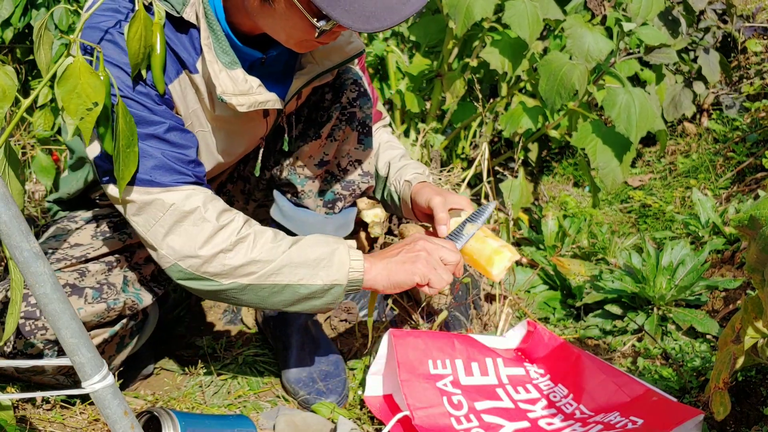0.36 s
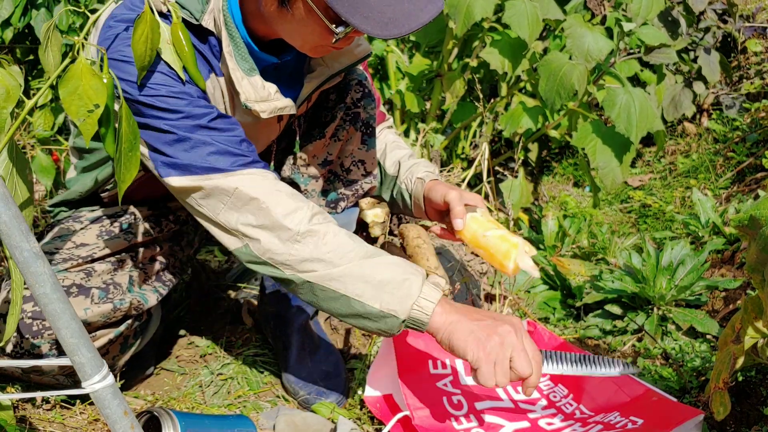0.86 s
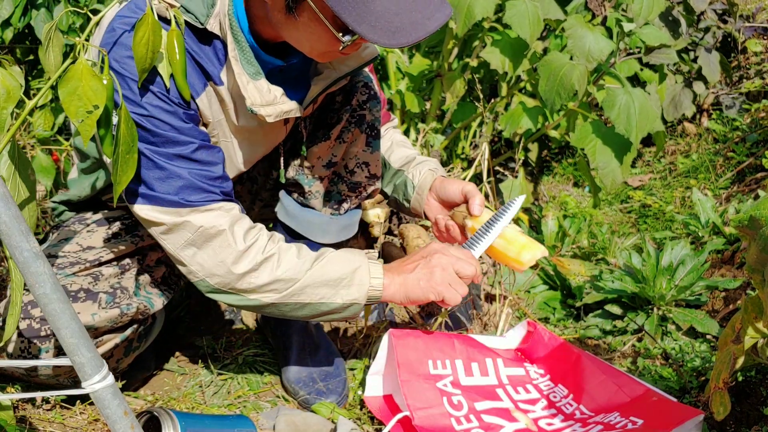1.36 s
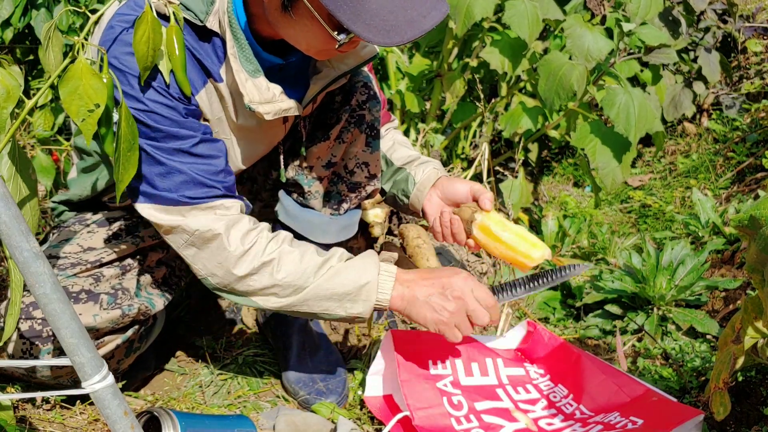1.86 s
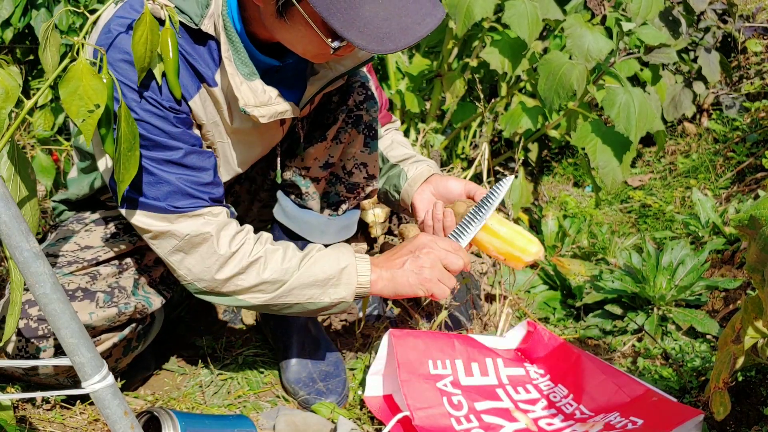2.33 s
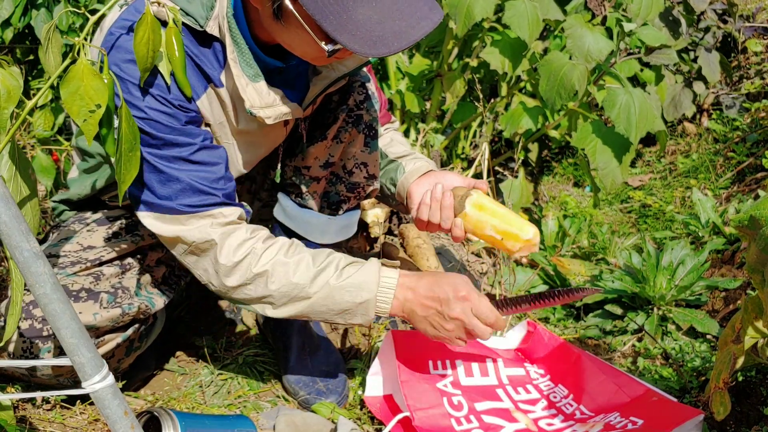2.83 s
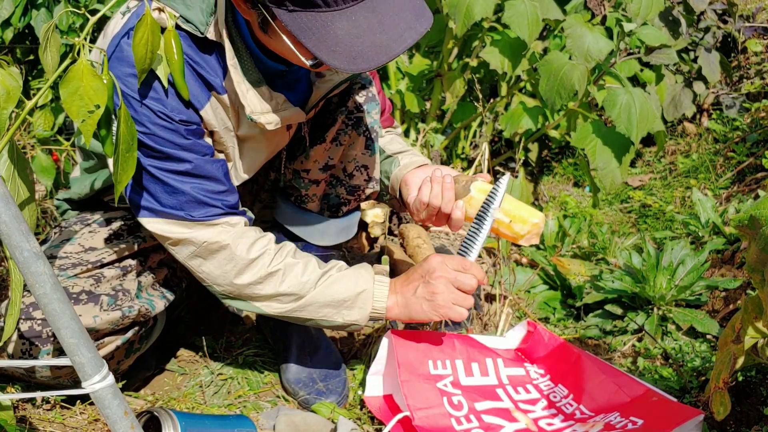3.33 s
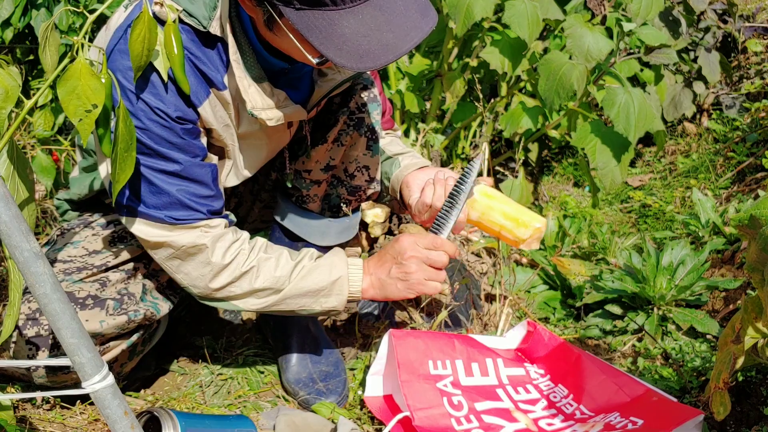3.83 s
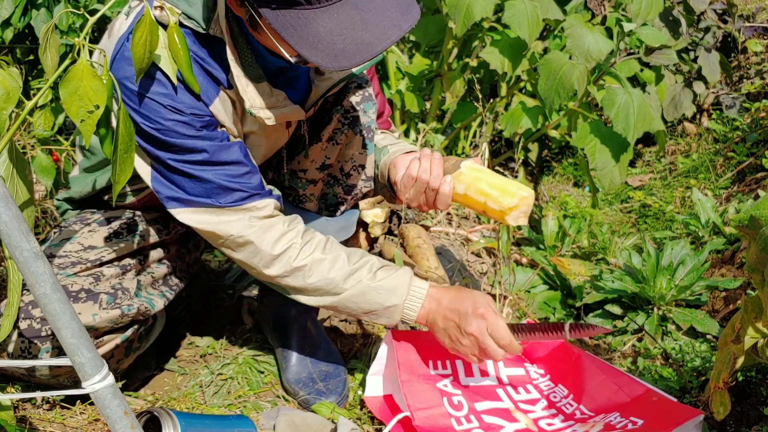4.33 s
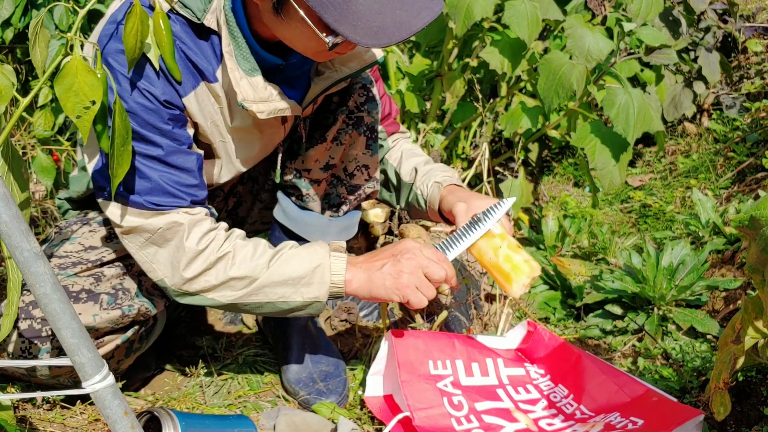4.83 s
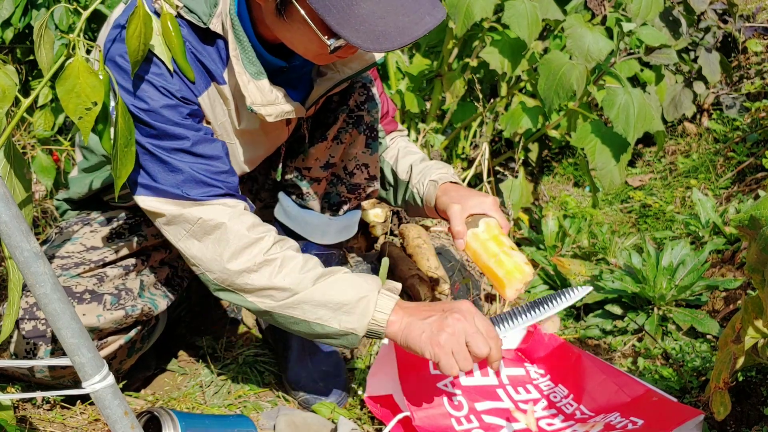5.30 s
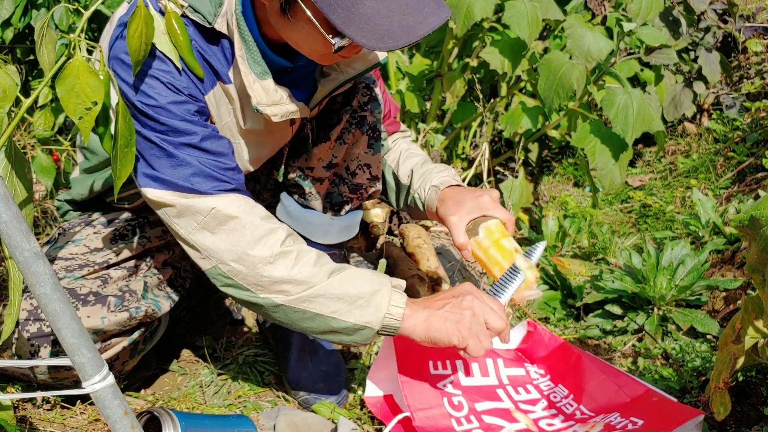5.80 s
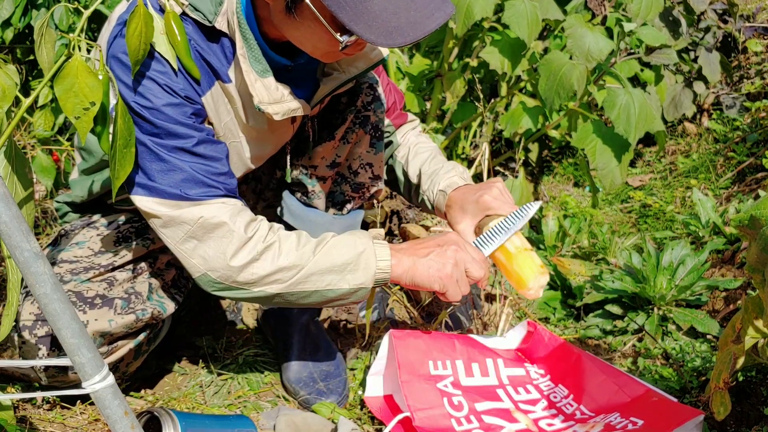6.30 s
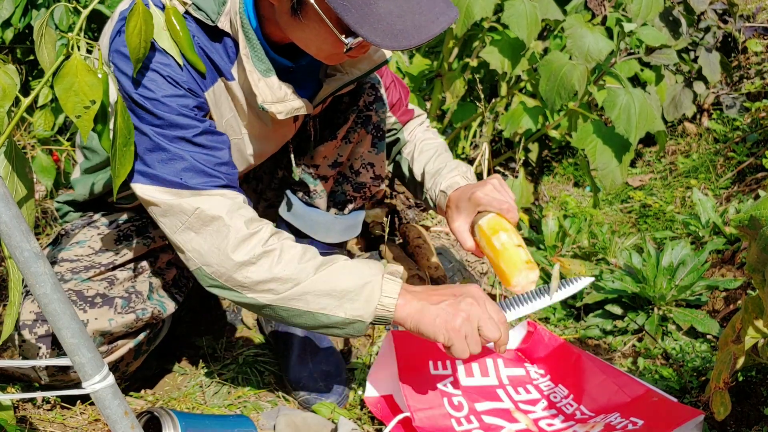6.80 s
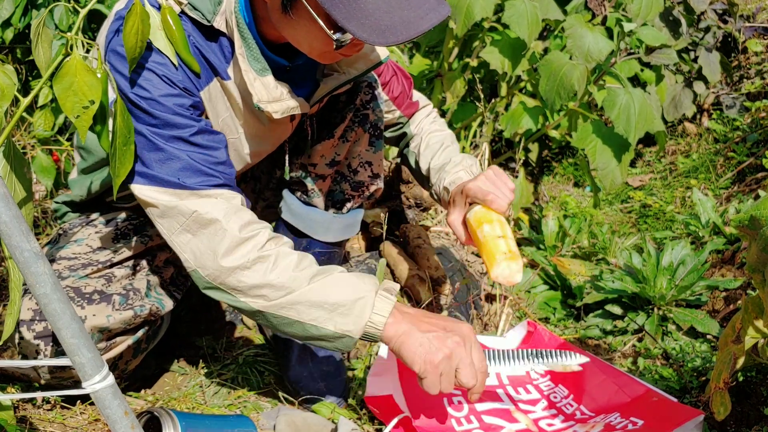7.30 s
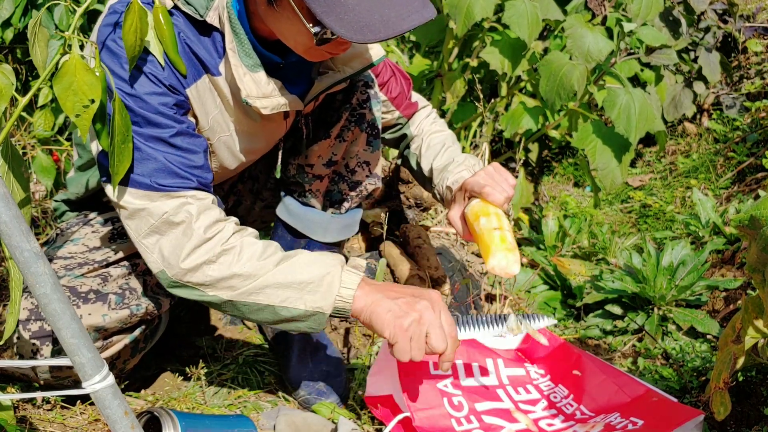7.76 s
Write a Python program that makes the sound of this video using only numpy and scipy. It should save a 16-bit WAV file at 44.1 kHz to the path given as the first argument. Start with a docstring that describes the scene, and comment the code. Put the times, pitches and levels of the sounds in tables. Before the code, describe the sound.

Outdoors, close to the work, in dry open air. A toothed steel blade peels a root in short gritty rasps, bright with a thin metallic edge: small scrapes from 0.2 s, firmer ones at 0.75 and 1.6, softer scraping around 2.5, a crisp stroke at 3.4, gentler ones near 4.3, strong strokes at 5.1 and 5.8 with hard snapping ticks, quieter ones after, and a last rasp and sharp click at 7.7-7.8. Peel lands on a stiff hollow bag: the loudest slap and crackle at 1.1 s, lighter patters at 2.8, 3.6 and 5.35-5.5, a faint one near 6. Tiny squeaks accompany some strokes. A thin high bird pips throughout, left of centre, clearest from 5.3 to 7.2. Low wind bumps the right side at 0.2, 1.0 and 5.1-5.5. Beneath lie a faint distant engine hum, leaf and traffic hiss, and insects.

```python
"""Outdoors among bushes, close to the work, heard at the left and right ports of a microphone.
A toothed steel blade peels a root in short gritty strokes of shaped noise, with ticks and squeaks; peelings
knock on a stiff shopping bag in runs of contacts, noise puffs through its resonances. Farther off a bird pips
in gliding sines, an engine and a second machine hum in steady lines, and leaves, far traffic and insects hiss
as filtered noise. Light wind nudges the ports with low noise."""
import sys
import numpy as np
from scipy import signal
from scipy.fft import rfft, irfft, next_fast_len
from scipy.io import wavfile
from scipy.ndimage import uniform_filter1d, map_coordinates

SR = 44100
rng = np.random.default_rng(int(sys.argv[2]) if len(sys.argv) > 2 else 0)


def voltage_ratio(decibels):
    """Convert decibels (scalar or array-like) to amplitude ratios, 20 dB per decade."""
    exponent = np.asarray(decibels, float) / 20
    return 10 ** exponent


def master(y):
    """Save y as 16-bit WAV."""
    cut = np.clip(np.atleast_2d(y).T, -1, 1)
    pcm = np.round(cut * 32767)  # scale
    wavfile.write(sys.argv[1], SR, pcm.astype(np.int16))


N = 348390  # samples, 7.9 s

# strokes of the blade along the root: (start of hold [s], rasp level at the peak [dB], swell [s], hold [s])
STROKES = [(.206, -104, .1, 0.009), (0.358, -86, 0.056, .005), (.452, -86, .06, 0.011),
           (0.571, -76.5, 0.041, 0.014), (0.751, -61, 0.087, .025), (0.827, -79.5, .04, 0.054),
           (1.175, -72, .05, 0.011), (1.53, -78, .08, .04), (1.6, -61, .12, .042),
           (2.396, -81, 0.11, 0.073), (2.513, -68.5, 0.013, 0.009), (2.54, -75, 0.054, 0.041),
           (2.627, -81, 0.26, 0.108), (3.194, -85.5, 0.22, 0.013), (3.278, -75.5, .05, 0.014),
           (3.365, -60, 0.033, 0.0237), (4.208, -69.5, 0.15, 0.055), (4.276, -73, .03, 0.017),
           (4.299, -73.5, .1, 0.047), (4.448, -84, 0.059, 0.012), (4.525, -86, 0.23, 0.027),
           (5.13, -59.5, 0.0645, .08), (5.809, -56, 0.1, 0.018), (6.066, -79, .04, 0.016),
           (6.146, -77, 0.045, 0.0092), (6.359, -83, 0.063, 0.0075), (6.559, -70.5, 0.15, 0.0144),
           (6.896, -88, 0.24, 0.016), (7.141, -77, 0.038, 0.037), (7.634, -80.5, 0.019, .04),
           (7.691, -62.5, 0.037, 0.017)]
# spectrum of the rasp under the teeth, before the steel's rings: (frequency [Hz], relative level [dB per Hz])
RASP_SPECTRUM = [(2350, -28.5), (4000, -11.5), (4160, -14), (6030, -1.5), (6570, 4.5), (7610, -5),
                 (9900, -6), (11600, -12.5), (13200, -18), (15600, -20.5)]
# spectrum of the rubbed flesh: (frequency [Hz], relative level [dB per Hz])
RUB_SPECTRUM = [(500, -42), (900, -3.5), (1500, -1.5), (3000, -5.5), (4500, -3.5), (6500, -31.5)]
# rings of the steel blade: (frequency [Hz], width [Hz], level [dB])
BLADE_RINGS = [(5200, 200, -2), (7760, 120, 7), (8490, 160, 4), (10000, 250, -1.5), (11440, 300, 2)]
# teeth catching and bits snapping off: (time [s], level before the decay [dB], centre [Hz], left over right [dB])
TICKS = [(.445, -70.5, 9360, -11), (0.6906, -67, 8700, -5), (1.186, -53, 1660, 1),
         (1.264, -63.5, 1537, 0.5), (1.4281, -61, 5870, -3.5), (1.543, -59, 4680, -4.5),
         (2.51, -61.5, 5700, -8.5), (3.367, -53, 9100, -4), (4.2695, -55.5, 7450, -2.5),
         (4.3674, -71, 9300, -1.5), (4.4349, -56, 4730, -3.5), (5.8175, -44.5, 8490, -1.5),
         (5.836, -41.5, 7700, 3), (6.0668, -74, 8450, -3), (6.367, -62.5, 4570, -7),
         (7.6934, -59.5, 7030, -9.5), (7.71, -51, 9780, -9.5), (7.7824, -83, 10300, 0.5),
         (7.834, -42.5, 4150, 0), (7.835, -49, 2530, -1.5)]
# runs of contacts on the bag, a longer landing taking several rows; thud and hardness are against the slap,
# all before the gains in drops(): (time [s], slap [dB], first gap of the run [s], thud [dB], hardness [dB])
CONTACT_RUNS = [(1.0672, -14, .0028, -8.5, 6), (1.081, -30.5, .003, -1.5, -6.5),
                (1.968, -48, 0.0033, -4, 1), (1.984, -50, 0.0024, -0.5, 7.5), (2.0, -52, 0.003, 2, 7),
                (2.011, -52.5, 0.0058, 1, 7), (2.256, -44.5, 0.0044, -7.5, -5.5),
                (2.789, -31, 0.0049, -10.5, 2.5), (3.619, -27, 0.0044, -4, 3.5),
                (3.6386, -37.5, 0.00203, -5, 3.5), (5.345, -33, 0.0054, -2, -4),
                (5.355, -37, .004, -1, 0.5), (5.365, -35.5, 0.0044, -7.5, -0.5),
                (5.4211, -33, 0.0019, -9, 4.5), (5.431, -37, 0.0029, -4.5, 7.5),
                (5.471, -49, 0.0055, -1, 2.5), (5.49, -60.5, .008, 5, 3), (5.522, -67.5, 0.01, 4.5, -8.5),
                (5.956, -39, 0.0047, -6, 8.5), (6.075, -56.5, 0.00202, -4.5, 1.5),
                (7.691, -64.5, 0.0027, -4, 9.5), (7.831, -63, .003, 1, 3)]
# air and panel modes of the bag: (frequency [Hz], width [Hz], level [dB])
HOLLOW_MODES = [(67.4, 20, -9.5), (110, 72, -3.5), (162, 30, 0), (210.16, 30, -2), (255, 40, 0),
                (345, 34, -4), (392.9, 40, 2.5), (480, 180, -5.5)]
# modes of the bag's skin: (frequency [Hz], width [Hz], level [dB])
SKIN_MODES = [(577, 78, 1.5), (770, 100, -1), (923, 95, -1.5), (1250, 110, -4.5)]
# tight creases of the bag: (frequency [Hz], width [Hz], level [dB])
CREASE_MODES = [(1460, 360, -9), (1650, 320, -1), (1950, 540, -12.5)]
# crackle of the bag's coating: (frequency [Hz], relative level [dB per Hz])
CRACKLE_SPECTRUM = [(1700, -38), (2400, -3.5), (3300, 4.5), (4600, 1.5), (6200, -5), (8000, -10),
                    (11000, -25.5), (13000, -50), (16000, -62.5)]
# brief unsteady squeaks and soft tones: (time [s], frequency [Hz], nominal level [dB rms], length [s])
SQUEAKS = [(0.014, 3130, -80.5, 0.049), (0.149, 7840, -82.5, 0.083), (1.197, 1173, -73.5, 0.062),
           (1.449, 2160, -77, 0.24), (1.711, 433, -68.5, 0.1), (2.351, 8530, -78.5, 0.13),
           (2.358, 2120, -76, 0.1), (2.355, 5200, -84, .1), (2.514, 8750, -77.5, 0.093),
           (2.552, 445, -75.5, 0.081), (3.372, 2030, -66, 0.054), (4.244, 1950, -66.5, 0.03),
           (4.418, 369, -74, 0.061), (5.158, 1990, -86, 0.1), (5.836, 1935, -73, 0.012),
           (6.059, 8550, -88.5, 0.077)]
# calls of the bird, a pip and a second part:
# (time [s], frequency [Hz], pip level [dB rms], pip length [s], second part relative to the pip level [dB])
PIPS = [(0.268, 5900, -86, 0.03, -11), (1.094, 5750, -87.5, .05, -8), (1.645, 5750, -85, 0.11, -15),
        (2.01, 5690, -83.5, .07, -15), (2.439, 5690, -85, .12, -12), (3.931, 5940, -83, 0.099, 3),
        (4.722, 5693, -80.5, 0.042, -0.5), (5.264, 5730, -73.5, 0.11, -4), (5.888, 5700, -67, 0.08, -15),
        (6.653, 5608, -72, 0.11, -8.5), (7.207, 5695, -70, 0.074, -13)]
# far engine: (multiple of the firing rate [1], level [dB rms])
ENGINE_ORDERS = [(2, -78), (3, -81), (5, -69.5), (6, -74), (7, -87.5), (8, -85)]
# spectrum of wind at the ports: (frequency [Hz], relative level [dB per Hz])
BUFFET_SPECTRUM = [(12, -31), (25, -1), (50, 0.5), (90, -8.5), (160, -31), (300, -70)]
# breeze at both ports: (time [s], level [dB])
BREEZE = [(0, -78), (1.1, -71), (2.4, -69.5), (2.6, -78.5), (4.9, -75), (5.5, -71), (5.7, -83.5),
          (7.9, -81)]
# gusts striking the right port: (start of hold [s], level [dB], hold [s])
GUSTS = [(0.184, -39.5, 0.063), (.85, -59.5, .01), (1.019, -44, .01), (1.499, -60.5, 0.052),
         (2.238, -63.5, 0.024), (5.113, -53.5, .02), (5.399, -52, .03), (5.487, -51, 0.046)]
# leaves and far traffic: (frequency [Hz], relative level [dB per Hz])
RUSH_SPECTRUM = [(190, -17), (199, -19), (253, -22.5), (724, -23.5), (785, -24.5), (948, -25.5),
                 (2430, -40.5), (3750, -41), (15600, -52)]
# likeness of the rush at the two ports: (frequency [Hz], left-right likeness [1])
RUSH_LIKENESS = [(60, 0.69), (150, 0.58), (300, .2), (1400, 0.012), (8000, 0)]


def strokes():
    """Dense grit under the teeth over a softer rub of flesh; the steel adds narrow rings that come and go."""
    swell_db, release, climb = 33, 902, 23  # growth over the swell [dB]; fall, deepening bite in the hold [dB/s]
    s, db, swell_s, hold = np.transpose(STROKES)
    press = swell(s, hold, db, swell_db / swell_s, release, climb)
    crumbs = swell(s + hold, 0, db - 22.5, release, 70)  # they settle after the stroke
    handling = voltage_ratio(-95.5 + 3 * wobble(6))  # faint and steady throughout, gently wavering
    force = press + crumbs + handling

    steel = lambda hz: 1 + np.abs(modes(BLADE_RINGS)(hz))
    rasp = filtered(patchy(grit(), 3.5, wide=2, long=9), lambda hz: voltage_ratio(along(RASP_SPECTRUM, hz)) * steel(hz))
    rub = filtered(patchy(grit(), 2, wide=5, long=8), lambda hz: voltage_ratio(along(RUB_SPECTRUM, hz)))
    # the rub gains 0.59 dB for each dB of force
    rub_gain = voltage_ratio(-78.5 + 1.5 * wobble(14)) * (force / voltage_ratio(-76)) ** 0.59
    both = force * unit(rasp) + rub_gain * unit(rub)
    return spaced(both, [(1500, 0.42), (4000, .4), (9000, 0.15)])


def grit():
    """Noise made grainy by random jumps and a quick wavering of its level."""
    grain_db = 2.2 * rng.exponential(size=N) + 2.0 * wobble(260)
    return unit(rng.standard_normal((2, N)) * voltage_ratio(grain_db))


def ticks():
    """Each tick is a short broad puff with a brief ring at its own pitch."""
    t60_s, rise_s, lead_s = 0.021, .0006, .001
    out, t = np.zeros((2, N + SR)), np.arange(SR // 10) / SR
    f = np.fft.rfftfreq(len(t), 1 / SR)
    for s, db, hz, pan_db in TICKS:
        hump = 1 / (1 + (np.log((f + 1) / hz) / .9) ** 2)
        broad = hump * (f > 1000) / (1 + (f / 12000) ** 8)
        puff = unit(irfft(rfft(rng.standard_normal((2, len(t)))) * broad, len(t)))
        ring = 0.55 * np.sin(2 * np.pi * hz * t)
        shape = voltage_ratio(db - 60 * t / t60_s) * (1 - np.exp(-t / rise_s))
        place(out, s - lead_s, (puff + ring) * shape * voltage_ratio([[pan_db / 2], [-pan_db / 2]]))
    return out[:, :N]


def drops():
    """Every contact pushes the hollow bag, slaps its skin, snaps its creases and crackles the coating."""
    s, db, thud_db, hard_db = rattle()
    # snap and crackle grow with hardness; slaps above -36 dB snap more
    snap_db = db + 0.54 * hard_db + .25 * (db + 36) + 11
    crackle_db = db + 1.8 * hard_db - 5

    thud = bursts(s, db + thud_db + 23, 0.031, rise=0.00033, kick=0.67)
    slap = bursts(s, db + 14, 0.029, rise=0.00014, kick=0.7)
    snap = bursts(s, snap_db, 0.016, rise=0.00035, kick=1.5)
    crackle = bursts(s, crackle_db, .013, rise=.001, kick=0.41)

    bag = filtered(thud, soft(modes(HOLLOW_MODES), 900))
    bag = bag + filtered(slap, soft(modes(SKIN_MODES), 2000))
    bag = bag + filtered(snap, soft(modes(CREASE_MODES), 4000))
    bag = bag + filtered(crackle, lambda hz: voltage_ratio(along(CRACKLE_SPECTRUM, hz)))
    both = spaced(bag, [(300, 0.97), (1500, 0.82), (3500, .55), (8000, .3)])
    # the two ports differ in level with frequency: (frequency [Hz], left gain and opposite right gain [dB])
    tilt = [(300, -.9), (1000, -0.83), (4000, -1.4), (8000, .8)]
    return filtered(both, lambda hz: voltage_ratio(along(tilt, hz) * np.array([[1], [-1]])))


def rattle():
    """Contacts of each run, ever further apart, the second the hardest: time, slap, thud, hardness."""
    s, db, gap, thud_db, hard_db = np.transpose(CONTACT_RUNS)[:, :, None]
    k = np.arange(5)  # contacts a run
    first, later = k == 0, np.clip(k - 1, 0, None)
    times = s + gap * k ** 1.35
    slap_db = db - 2 * first - 5 * later ** 1.5  # the first touch is lighter and softer
    hard_db = hard_db - 3 * first - 4.5 * later
    thud_db = thud_db + 1.6 * k
    return [a.ravel() for a in (times, slap_db, thud_db, hard_db)]


def bursts(times, levels_db, t60, rise, kick):
    """Pairs of dying noise puffs; the first of each pair opens with one sharp push, kick times the puff's size."""
    out, t = np.zeros((2, N + SR)), np.arange(SR // 10) / SR
    shape = voltage_ratio(-60 * t / t60) * (1 - np.exp(-t / rise))
    for s, db in zip(times, levels_db):
        puff = shape * rng.standard_normal((2, len(t)))
        puff[0, 0] = kick * np.linalg.norm(shape)
        place(out, s, voltage_ratio(db) * puff)
    return out[:, :N]


def soft(response, top_hz):
    """A response dulled above the pitch that a soft contact can excite."""
    return lambda f: response(f) / (1 + 1.4j * f / top_hz - (f / top_hz) ** 2) ** 2


def squeaks():
    """Narrow, broken noise that swells and fades."""
    out, t = np.zeros((2, N + SR)), np.arange(SR // 4) / SR
    f = np.fft.rfftfreq(len(t), 1 / SR)
    for s, hz, db, length in SQUEAKS:
        width_hz = min(.06 * hz, 170)
        band = np.exp(-((f - hz) / width_hz) ** 2)
        tone = unit(irfft(rfft(rng.standard_normal((2, len(t)))) * band, len(t)))
        shape = np.sin(np.pi * np.clip(t / length, 0, 1))
        place(out, s, voltage_ratio(db + 2.5 * wobble(60)[:len(t)]) * tone * shape)
    return spaced(out[:, :N], [(1000, 0.94)])


def foliage(x):
    """Leaves and stalks scatter a weak, short wash back, mostly treble."""
    t = np.arange(SR // 4) / SR
    tail = rng.standard_normal((2, len(t))) * voltage_ratio(-60 * t / 0.093) * (1 - np.exp(-t / 0.0079))
    wash = signal.fftconvolve(x, tail / np.linalg.norm(tail[0]), axes=1)[:, :N]
    return filtered(wash, lambda hz: voltage_ratio(along([(600, -16), (2000, -11.5), (3000, 1)], hz)))


def bird():
    """A thin whistle slides onto its pitch; the second part of the call is a flickering tail on that pitch."""
    slide_hz, bend_hz, pan_db = 25, 15, 5.5  # pan is left over right
    tail_end_s = .225  # about where the second part ends, from the start of the call
    out, t = np.zeros((2, N + SR)), np.arange(SR // 2) / SR
    for s, hz, db, length, tail_db in PIPS:
        bend = bend_hz * np.sin(rng.uniform(15, 35) * t + rng.uniform(0, 2 * np.pi))
        pitch = hz + slide_hz * np.exp(-t / 0.027) + bend
        tone = np.sqrt(2) * np.sin(2 * np.pi * np.cumsum(pitch) / SR)
        pip = np.sin(np.pi * np.clip(t / length, 0, 1)) ** 2.0 * voltage_ratio([[pan_db / 2], [-pan_db / 2]])

        noise = rng.standard_normal((2, len(t)))
        flicker = unit(uniform_filter1d(uniform_filter1d(noise, size=350), size=350))
        tail = voltage_ratio(tail_db + np.array([[2.5], [-2.5]]) - 60 * t / 1.6)
        tail = tail * np.clip((t - .85 * length) / .025, 0, 1)  # fades in as the pip ends
        tail = tail * (.95 + .35 * flicker) / (1 + (t / tail_end_s) ** 12)
        place(out, s, voltage_ratio(db) * tone * (pip + tail))
    return out[:, :N]


def hum():
    """Low orders of a far engine and a second machine, each wavering on its way through the air."""
    firing_hz, second_machine = 21.54, (48.3, -71)  # second: (frequency [Hz], level [dB rms])
    turn = 2 * np.pi * np.cumsum(1 + 0.0041 * wobble(0.82)) / SR  # all lines drift in pitch together
    total = np.zeros(N)
    for hz, db in [(k * firing_hz, db) for k, db in ENGINE_ORDERS] + [second_machine]:
        gain = np.sqrt(2) * voltage_ratio(db + 0.5 * wobble(2.8))
        total += gain * np.sin(hz * turn + rng.uniform(0, 2 * np.pi))
    return total


def wind():
    """Low noise of wind buffeting the ports, its waveform unrelated from port to port."""
    lumps = unit(filtered(rng.standard_normal((2, N)), lambda hz: voltage_ratio(along(BUFFET_SPECTRUM, hz))))
    breeze_db = np.interp(np.arange(N) / SR, *np.transpose(BREEZE))
    breeze = voltage_ratio(breeze_db + 1.8 * np.array([wobble(17), wobble(6)]))
    s, db, hold = np.transpose(GUSTS)
    gusts = swell(s, hold, db, rise_db_per_s=400, fall_db_per_s=296)
    return lumps * (breeze + gusts * voltage_ratio([[-22.5], [0]]))  # the left port is sheltered


def field():
    """Distant rush of leaves and far traffic as patchy noise, with a narrow band of insects."""
    # flat below 190 Hz, with a step down below 40 Hz
    colour = lambda hz: voltage_ratio(along(RUSH_SPECTRUM, np.maximum(hz, 190)) - 5.8 * (hz < 40))
    rush = filtered(patchy(rng.standard_normal((2, N)), 0.9, wide=4, long=30), colour)
    rush = voltage_ratio(-71 + 0.23 * wobble(0.99)) * unit(spaced(rush, RUSH_LIKENESS))
    insects = filtered(rng.standard_normal((2, N)), lambda hz: np.exp(-((hz - 6550) / 250) ** 2))
    return rush + voltage_ratio(-99 + 3.8 * wobble(6.8)) * unit(insects)


def spaced(pair, alike):
    """Two unrelated signals mixed to a likeness at the two ports; the sound reaches the right port first."""
    lag_s = 3.6 / SR
    turn = lambda hz: np.arccos(np.clip(along(alike, hz), -1, 1)) / 2
    mid, side = filtered(pair, lambda hz: np.array([np.cos(turn(hz)), np.sin(turn(hz))]))
    delay = lambda hz: np.exp(-2j * np.pi * hz * np.array([[lag_s], [0]]))
    return filtered(np.array([mid + side, mid - side]), delay)


def swell(start, hold, db, rise_db_per_s, fall_db_per_s, climb_db_per_s=0):
    """Summed gain of events that rise, hold (climbing to their peak) and fall along straight lines in dB."""
    t = np.arange(0, N / SR + .002, .001)[:, None]
    rise = rise_db_per_s * np.clip(start - t, 0, None)
    fall = fall_db_per_s * np.clip(t - start - hold, 0, None)
    climb = climb_db_per_s * np.clip(start + hold - t, 0, hold)
    gain = np.sqrt(np.sum(voltage_ratio(db - rise - fall - climb) ** 2, axis=1))
    return np.interp(np.arange(N) / SR, t[:, 0], gain)


def place(out, s, sound):
    """Adds a sound to the two ports from s seconds on."""
    out[:, round(s * SR):][:, :sound.shape[1]] += sound


def patchy(x, patchy_db, wide, long):
    """Noise with patches of random gain in time and frequency."""
    z = signal.stft(x, nperseg=256)[2]
    patches = uniform_filter1d(uniform_filter1d(rng.standard_normal(z.shape[1:]), wide, 0), long, 1)
    return signal.istft(z * voltage_ratio(patchy_db * unit(patches)), nperseg=256)[1][:, :N]


def modes(table):
    """Causal response of (frequency [Hz], width [Hz], level [dB]) resonances, alternating in sign."""
    ring = lambda f, c, w, db: voltage_ratio(db) * 1j * f * w / (c * c - f * f + 1j * f * w)
    return lambda f: sum((-1) ** k * ring(f, *row) for k, row in enumerate(table))


def filtered(x, response):
    """x times a complex response of frequency."""
    m = next_fast_len(N + 8192)
    return irfft(rfft(x, m) * response(np.fft.rfftfreq(m, 1 / SR)), m)[..., :N]


def along(points, hz):
    """(frequency [Hz], value) points joined on a log frequency axis."""
    f, v = np.transpose(points)
    return np.interp(np.log(hz + 1), np.log(f + 1), v)


def wobble(rate):
    """A smooth random curve, rate knots a second."""
    return map_coordinates(rng.standard_normal(int(N * rate / SR) + 4), [np.arange(N) * rate / SR])


def unit(x):
    """Scaled to rms 1."""
    return x / np.sqrt(np.mean(x ** 2) + 1e-20)


def scene():
    """All sources at the two ports; the foliage answers the ticks and the bag."""
    near = ticks() + drops()
    work = near + voltage_ratio(-22.5) * foliage(near) + strokes() + squeaks()
    return work + bird() + hum() + wind() + field()


def low_pass(x):
    """Removes everything above the highest recorded frequency."""
    return signal.sosfilt(signal.butter(12, 15760, fs=SR, output="sos"), x)


def record(dry):
    """The finished mix of the two ports, left and right."""
    return low_pass(dry)


dry = scene()
out = record(dry)
master(out)
```